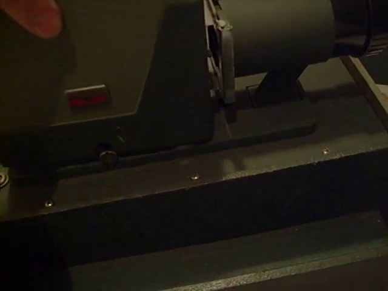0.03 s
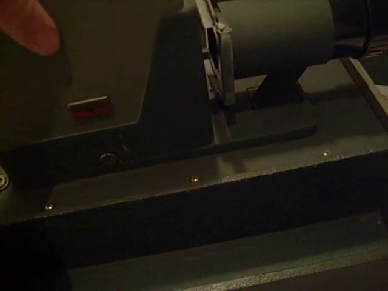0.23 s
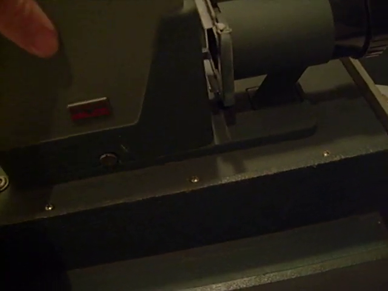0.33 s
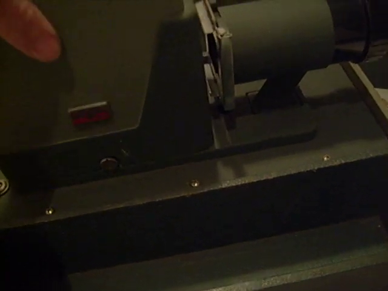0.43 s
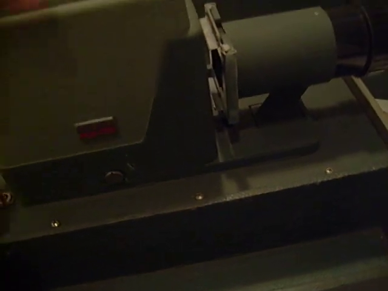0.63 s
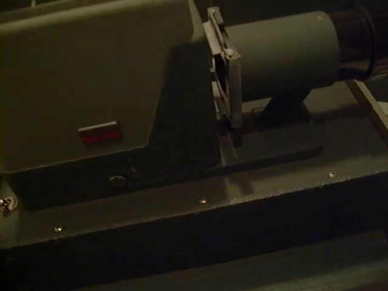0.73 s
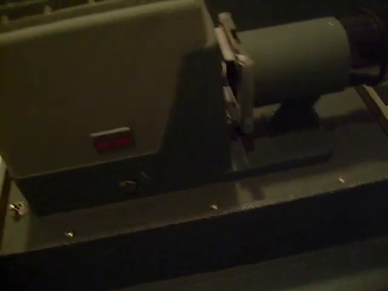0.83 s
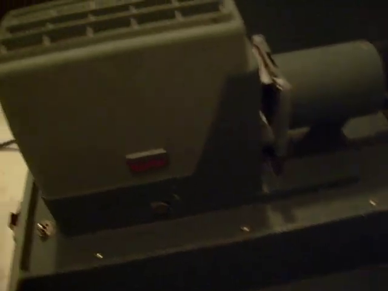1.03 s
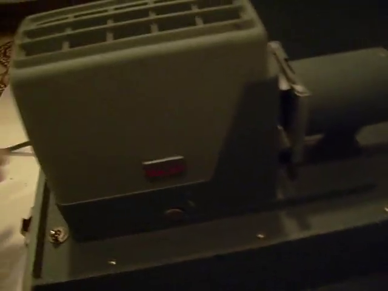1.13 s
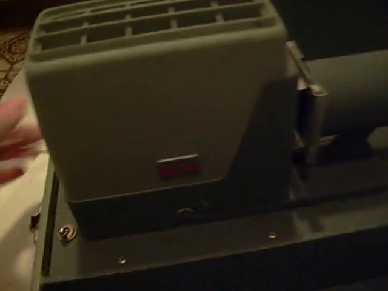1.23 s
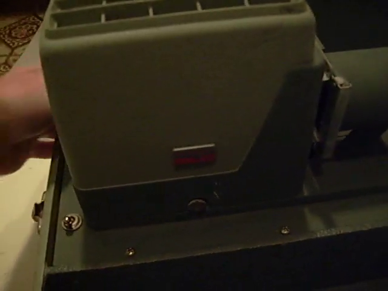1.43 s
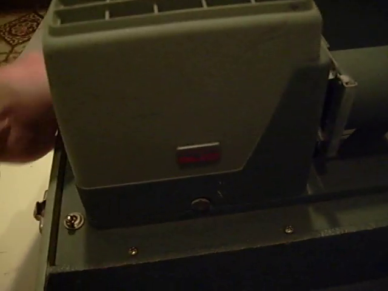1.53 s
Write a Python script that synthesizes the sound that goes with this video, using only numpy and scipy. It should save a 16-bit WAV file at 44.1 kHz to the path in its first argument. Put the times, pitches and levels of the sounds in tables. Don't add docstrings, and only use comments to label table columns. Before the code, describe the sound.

Slide projector carrier pushed in by hand: two light metallic rattles and a scrape, then a loud rapid triple clack, ringing briefly in a small room; the cooling fan hums quietly throughout, close camera microphone with faint hiss.

```python
import sys
import numpy as np
from scipy import signal
from scipy.fft import rfft, irfft
from scipy.io import wavfile
from scipy.ndimage import uniform_filter1d

SR = 44100
rng = np.random.default_rng(int(sys.argv[2]) if len(sys.argv) > 2 else 0)


def boost_factor(decibels):
    exponent = np.asarray(decibels, float) / 20
    return 10 ** exponent


def unload_audio(sound):
    columns = np.transpose(np.atleast_2d(sound))
    steps = np.round(np.clip(columns, -1, 1) * 32767)
    wavfile.write(sys.argv[1], SR, steps.astype(np.int16))


N = 70560


def evened(x):
    return x / np.sqrt(np.mean(abs(x) ** 2) + 1e-20)


def read(points, hz):
    f, value = np.transpose(points)
    return np.interp(np.log(hz + 1), np.log(f + 1), value)


def coloured(points, size):
    spectrum = rfft(rng.standard_normal(size))
    gain = boost_factor(read(points, np.fft.rfftfreq(size, 1 / SR)))
    return evened(irfft(spectrum * gain, size))


def drift(seconds):
    size = max(round(seconds * SR), 1)
    once = uniform_filter1d(rng.standard_normal(N), size)
    return evened(uniform_filter1d(once, size))


def carrier():
    # t/s, force/dB, chatter length/s, housing share/dB, thin-spring share/dB
    slide_contacts = [(.0266, -41.5, 0.0044, 9.5, 6), (.031, -38, 0.0079, -4.5, 9.5),
                      (.0392, -44.5, .005, 12.5, -4), (.0465, -35.5, 0.0035, 9, 2),
                      (.053, -41.5, .010, 2.5, -1), (.0845, -40, 0.00205, 0.5, -11),
                      (.088, -44.5, .009, 4.5, -9.5), (.0955, -37, 0.0088, -9.5, 10),
                      (.1005, -38, .012, 2.5, 14.5), (.118, -44.5, .012, 3, -6),
                      (.1415, -47.5, 0.009, 2, -8.5), (.157, -41, .025, 2, -11)]
    # t/s, force/dB, length/s, housing/dB,
    # spring/dB
    slam_and_settling = [(0.1817, -36, .003, 6, -20), (0.1842, -29.5, .003, 1, -12.5),
                         (0.19, -28.5, .015, 1, 5), (0.2044, -18, .005, 0.5, -13),
                         (0.2083, -20.5, 0.0035, 1, -18), (0.2124, -22, .007, -9, -8),
                         (0.2206, -9.5, 0.0018, -2, -2.5), (0.2223, -12, 0.0028, -7, -8.5),
                         (.2268, -9, .007, -10.5, -0.5), (0.234, -18, 0.0076, -10, -19),
                         (0.246, -35.5, 0.0078, -1.5, -18), (1.573, -54, .006, -11, -16),
                         (1.592, -62, 0.0052, -2, -16),
                         (.4945, -67, .001, -20, 17),
        (.6591, -72, .001, -20, 28),
        (1.517, -63, .002, 8, -14),
    ]
    out = np.zeros(N + SR)
    for start_s, force_db, length_s, housing_db, spring_db in slide_contacts + slam_and_settling:
        sound = contact(length_s, housing_db, spring_db)
        at = round(start_s * SR)
        out[at:at + len(sound)] += boost_factor(force_db) * sound
    return out[:N]


def contact(length_s, housing_db, spring_db):
    # f/Hz, level/dB, t60/s
    housing_modes = [(180, -22.5, .04), (375, -20, 0.044), (440, -11.5, 0.082), (527.4, -8.5, 0.055),
                     (755, 4.5, 0.026), (878, -7.5, 0.018), (1115, -1.5, .025), (1224, 2, 0.034)]
    # f/Hz, level/dB, t60/s
    carrier_modes = [(1512, -5.5, 0.046), (1698, -1.5, 0.03), (1816, -8.5, 0.048), (2077, -2, 0.027),
                     (2220, -25.5, .025), (2525, 4.5, 0.037), (2630, -1, 0.019), (2820, -1, 0.022),
                     (3030, -7.5, .025), (3118, 3, .03), (3205, 4.5, 0.054), (3510, -10.5, 0.023),
                     (3686, 0, 0.024), (4050, -19, 0.012)]
    # f/Hz, level/dB, t60/s
    spring_modes = [(4180, -1, 0.039), (4600, -2, .022), (5246, -2, 0.032), (6000, -11, .03),
                    (6500, -14, 0.034), (7100, -11, 0.034)]
    # f/Hz, level/dB
    crack_spectrum = [(100, -34.5), (300, -31.5), (750, -12), (1600, -15.5), (3200, 8.5), (5000, -16.5),
                      (8000, -33.5), (12000, -63), (20000, -96)]
    # f/Hz, level/dB
    fizz_spectrum = [(2000, -27), (4500, -18.5), (6000, -10.5), (9000, -4), (11000, -6), (12500, -36),
                     (20000, -67)]
    t = np.arange(5000) / SR
    knocks = chatter(length_s)
    fizz = boost_factor(-12.5 - 60 * t / 0.024) * coloured(fizz_spectrum, len(t))
    spring = ring(spring_modes, t, knocks) + fizz
    body = ring(carrier_modes, t, knocks) + boost_factor(housing_db) * ring(housing_modes, t, knocks)
    body = (body + boost_factor(spring_db - 12) * spring) / 3
    crack = boost_factor(-2 - 60 * t / 0.015) * coloured(crack_spectrum, len(t))
    return signal.fftconvolve(knocks, body + crack)


def chatter(length_s):
    rate_per_s, spread_db, first_knock = 2500, 2.5, 2.2
    u = np.arange(1200) / SR
    happens = rng.random(len(u)) < rate_per_s / SR
    sign = np.sign(rng.standard_normal(len(u)))
    size = boost_factor(spread_db * rng.standard_normal(len(u)))
    fade = np.clip((length_s - u) * 2000, 0, 1)
    knocks = happens * sign * size * fade
    knocks[0] = first_knock
    return knocks / np.linalg.norm(knocks)


def ring(modes, t, knocks):
    spread_db, rise_cycles = 2.0, 0.7
    luck = rng.standard_normal(len(modes))
    hz, db, t60 = np.transpose(modes)[:, :, None]
    fed = abs(np.exp(-2j * np.pi * hz * t[:len(knocks)]) @ knocks)[:, None] + 0.3
    rise = np.minimum(hz * t / rise_cycles, 1)
    wave = np.sign(luck[::-1, None]) * np.sin(2 * np.pi * hz * t) * rise / fed
    decay = boost_factor(db + spread_db * luck[:, None] - 60 * t / abs(t60))
    return (decay * wave).sum(0)


def room(x):
    # f/Hz, t60/s
    room_decay = [(200, 0.41), (1000, 0.21), (3000, 0.22), (8000, 0.16)]
    level_db, delay_s = -12, 0.002
    taps = np.zeros(SR // 2)
    at = np.arange(0, SR // 2 - 20, 20)
    taps[at + rng.integers(0, 20, len(at))] = rng.choice([-1., 1.], len(at))
    taps *= np.clip(np.arange(len(taps)) / SR / delay_s - 1, 0, 1)
    hz, t, z = signal.stft(taps, SR, nperseg=256)
    decay = boost_factor(-60 * t / read(room_decay, hz)[:, None])
    tail = signal.istft(z * decay, SR, nperseg=256)[1]
    return boost_factor(level_db) * signal.fftconvolve(x, tail / np.linalg.norm(tail))[:N]


def fan():
    # t/s, level/dB
    closeness = [(0, 0.5), (0.451, -1), (.7, -2), (0.999, -1.35), (1.3, -1.1), (1.5, 0), (1.6, 1.5)]
    near_db = np.interp(np.arange(N) / SR, *np.transpose(closeness))
    return (airflow() + motor()) * boost_factor(near_db)


def airflow():
    # f/Hz, level/dB
    air_spectrum = [(18, -54.5), (30, -29), (113, -20), (189, -6), (448, -13), (585, -7), (996, -10),
                    (3370, -9), (6000, -33.5), (7800, -76), (13200, -120)]
    # f/Hz, width/Hz, level/dB
    cavities = [(172, 32, -86), (351.3, 46, -66.5), (484, 28, -72.5), (586, 45, -65.5), (759, 63, -68),
                (1220, 110, -72), (1467, 56, -74.5), (1700, 100, -73), (2640, 52, -75.5),
                (3020, 220, -71.5), (3380, 350, -67)]
    air_db, patch_db, flicker_db = -66.5, 1.0, 0.7
    frames, hz = N // 512 + 5, np.fft.rfftfreq(2048, 1 / SR)[:, None]
    a, b, patches = rng.standard_normal((frames, 1025, 3)).T
    patches = evened(uniform_filter1d(uniform_filter1d(patches, 14, 0), 5, 1))
    shape = boost_factor(read(air_spectrum, hz) - 40 * np.maximum(np.log2(hz / 6000 + 1e-9), 0))
    power = boost_factor(2 * air_db) * shape ** 2 / np.sum(shape ** 2)
    for mid_hz, width_hz, db in cavities:
        peak = 1 / (1 + (2 * (hz - mid_hz) / width_hz) ** 2 * 0.41) ** 2
        power = power + boost_factor(2 * db) * peak / peak.sum()
    z = (a + 1j * b) * np.sqrt(power) * boost_factor(patch_db * patches)
    air = signal.istft(z, nperseg=2048, noverlap=1536)[1][:N]
    return evened(air) * np.sqrt(power.sum()) * boost_factor(flicker_db * drift(0.008))


def motor():
    # f/Hz, level/dB rms, waver/Hz
    motor_tones = [(61.3, -99, 3.2), (194, -75.5, .8), (416, -78, 1.2), (560, -71, 5.4)]
    out = np.zeros(N)
    for hz, db, waver_hz in motor_tones:
        level = np.sqrt(2) * boost_factor(db + 1.4 * drift(0.02))
        phase = 2 * np.pi * np.cumsum(hz + waver_hz * drift(0.03)) / SR
        out += level * np.sin(phase)
    return out


def scene():
    band = signal.butter(3, [190, 7620], "bandpass", fs=SR, output="sos")
    clacks = signal.sosfilt(band, carrier())
    return (clacks + room(clacks) + fan())[None]


def low_pass(x):
    return signal.sosfilt(signal.butter(12, 12260, fs=SR, output="sos"), x)


def record(dry):
    # f/Hz, level/dB
    hiss_spectrum = [(30, -5), (300, -25), (5000, -9), (8000, -8), (10200, -8.5), (11200, -14),
                     (12200, -31), (13500, -49)]
    edge = signal.firwin(63, 11900, window=("kaiser", 7), fs=SR)
    hiss = boost_factor(-83.5) * coloured(hiss_spectrum, N)
    whine = boost_factor(-101) * np.sin(2 * np.pi * 8000 * np.arange(N) / SR)
    mix = signal.oaconvolve(dry, edge[None], "same") + hiss + whine
    return low_pass(mix)


dry = scene()
out = record(dry)
unload_audio(out)
```